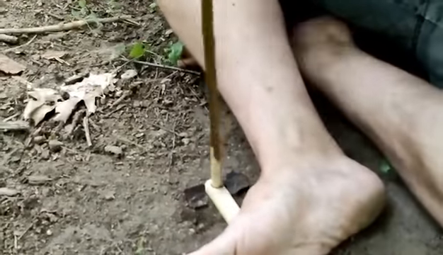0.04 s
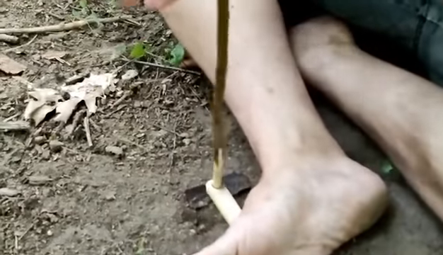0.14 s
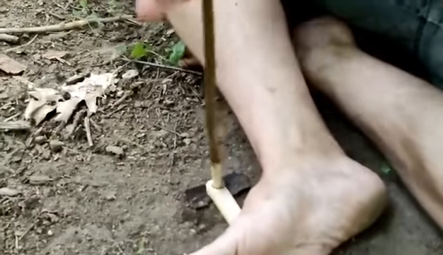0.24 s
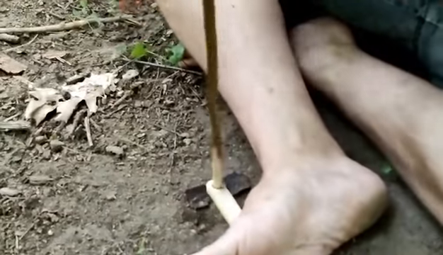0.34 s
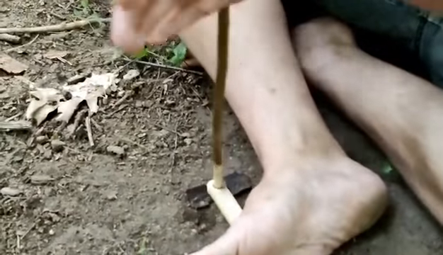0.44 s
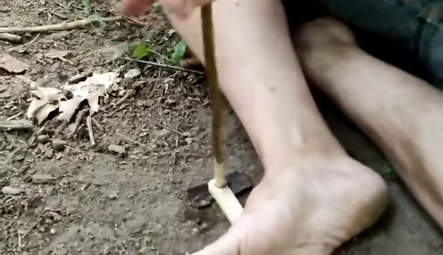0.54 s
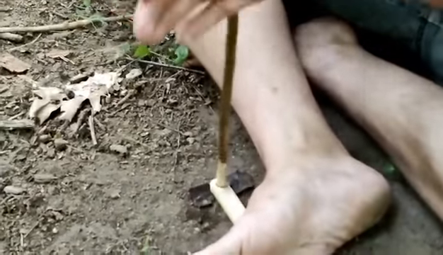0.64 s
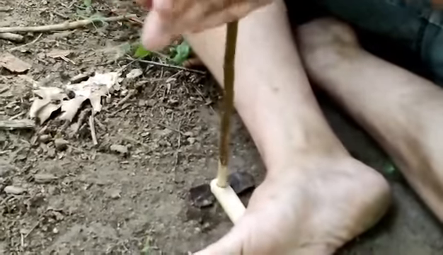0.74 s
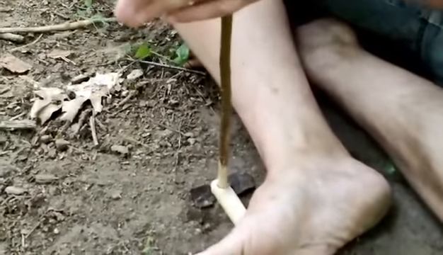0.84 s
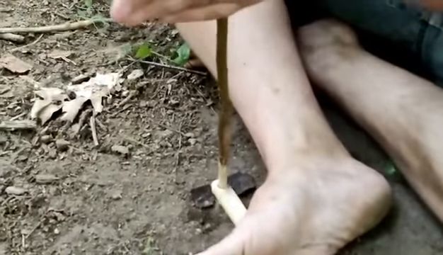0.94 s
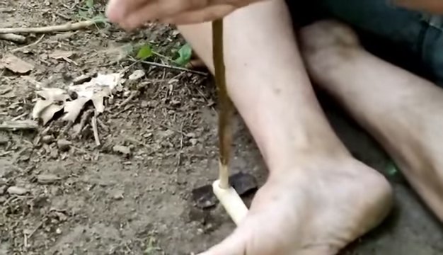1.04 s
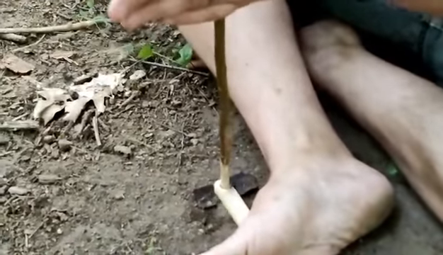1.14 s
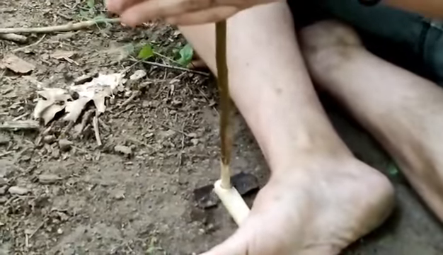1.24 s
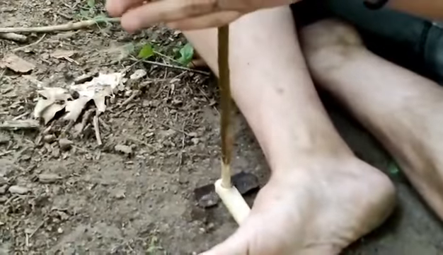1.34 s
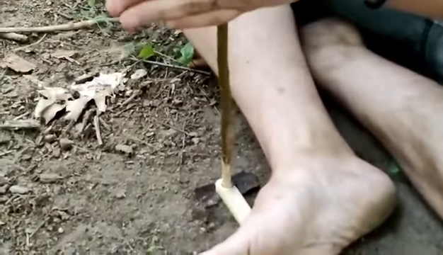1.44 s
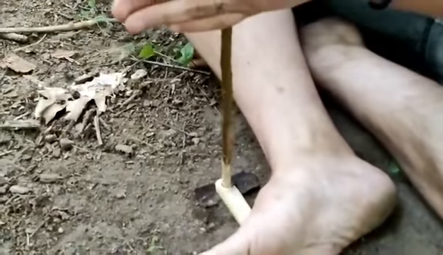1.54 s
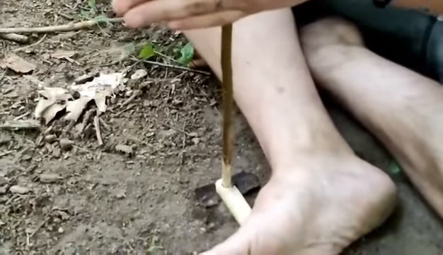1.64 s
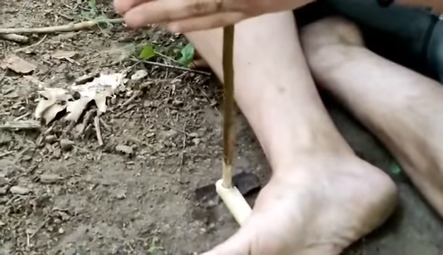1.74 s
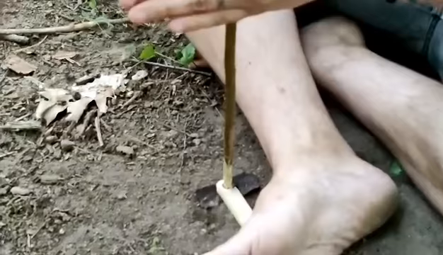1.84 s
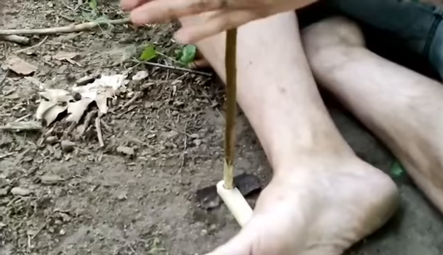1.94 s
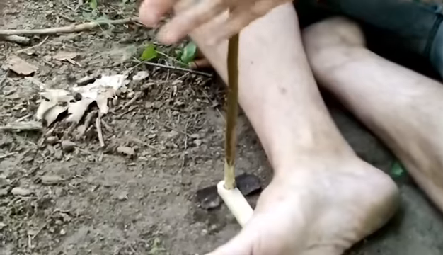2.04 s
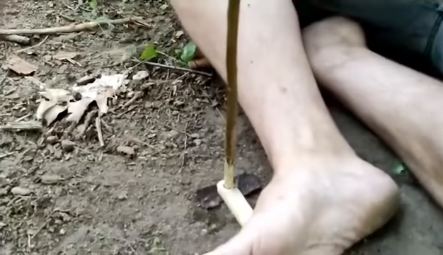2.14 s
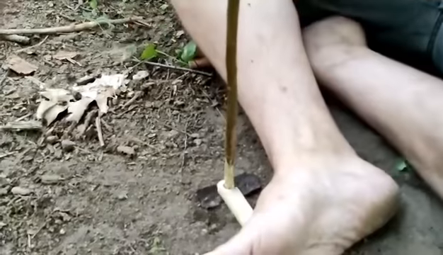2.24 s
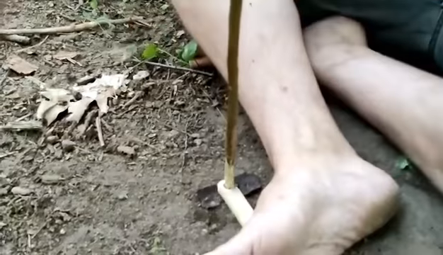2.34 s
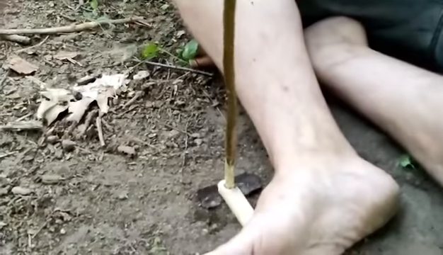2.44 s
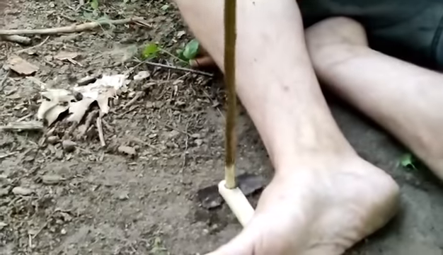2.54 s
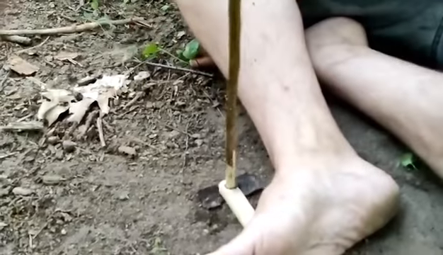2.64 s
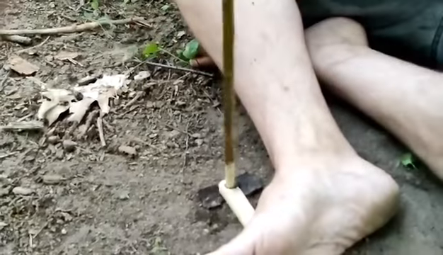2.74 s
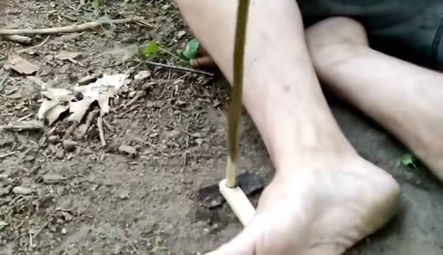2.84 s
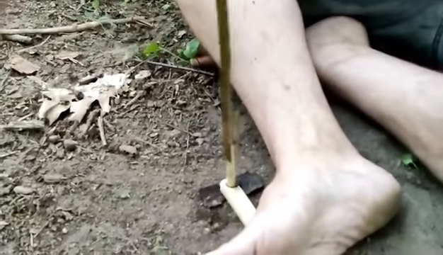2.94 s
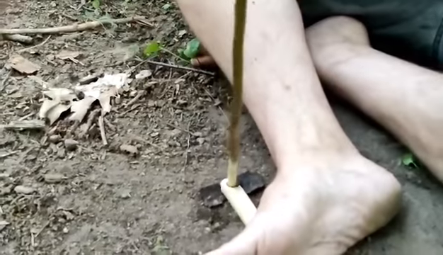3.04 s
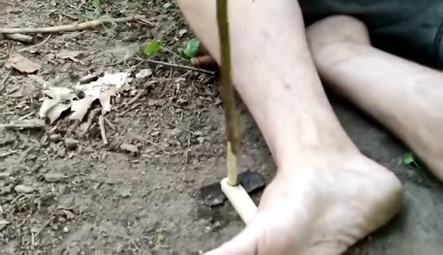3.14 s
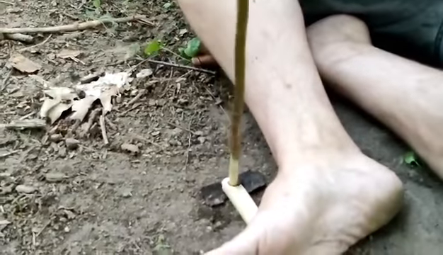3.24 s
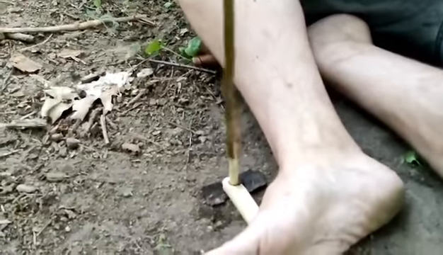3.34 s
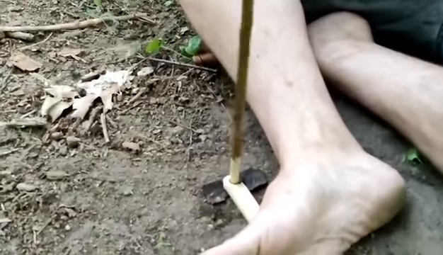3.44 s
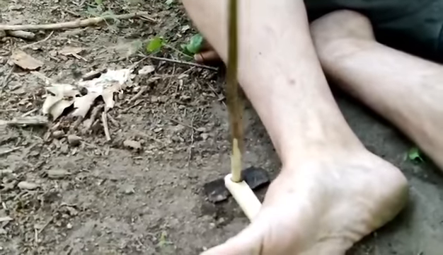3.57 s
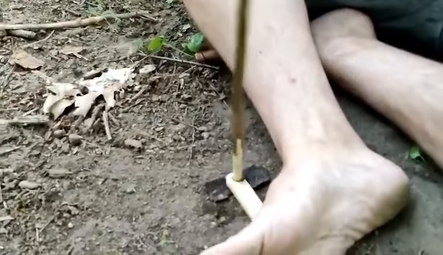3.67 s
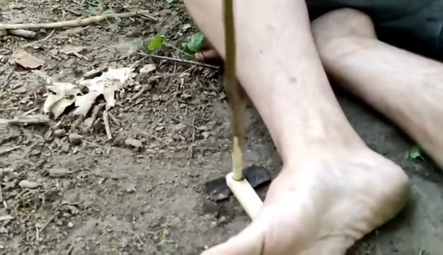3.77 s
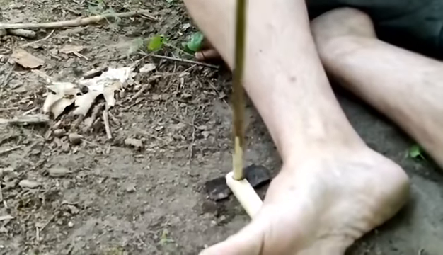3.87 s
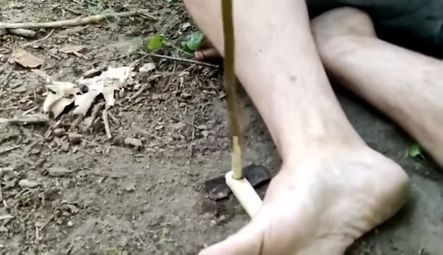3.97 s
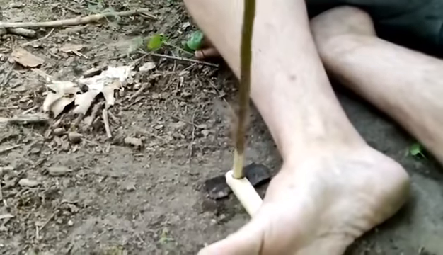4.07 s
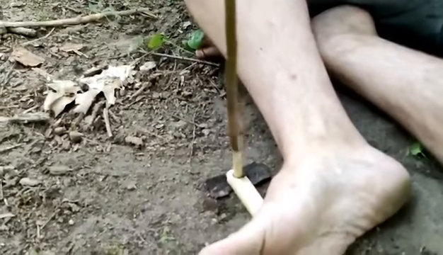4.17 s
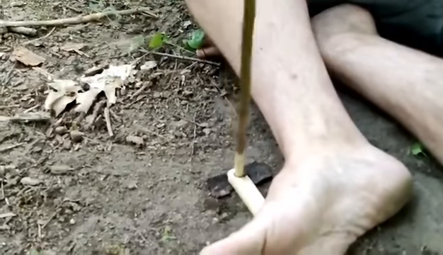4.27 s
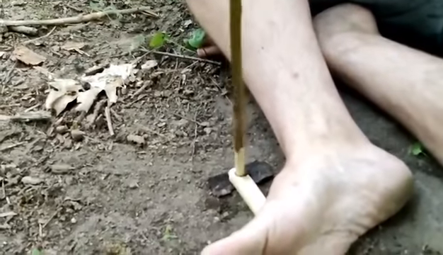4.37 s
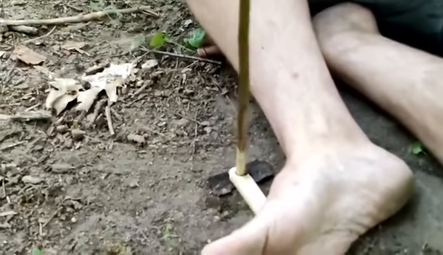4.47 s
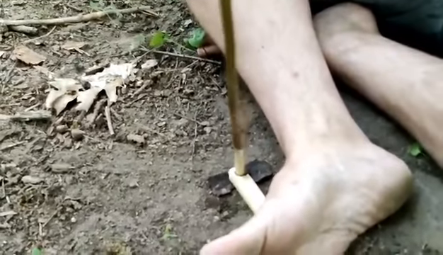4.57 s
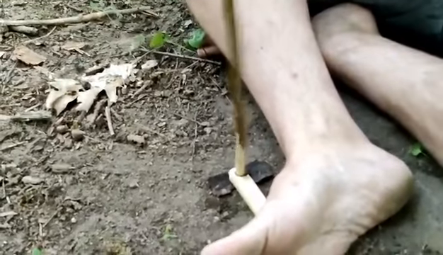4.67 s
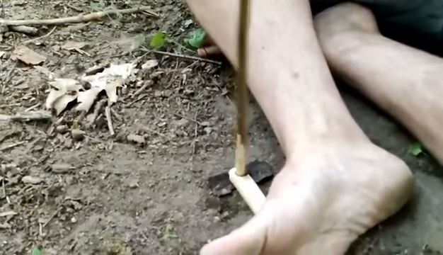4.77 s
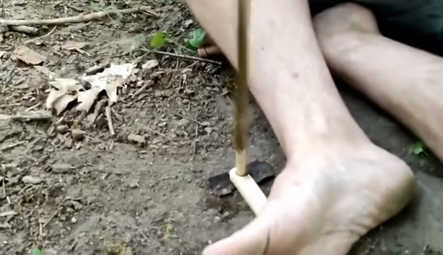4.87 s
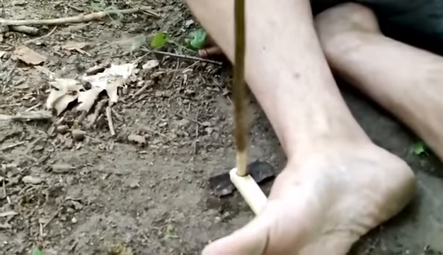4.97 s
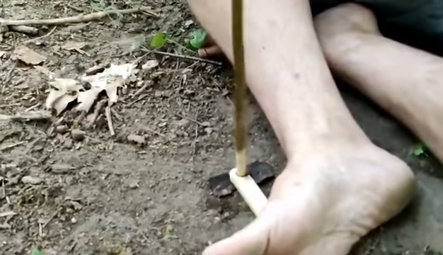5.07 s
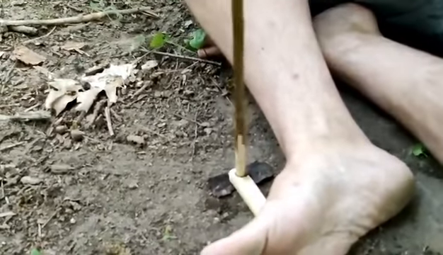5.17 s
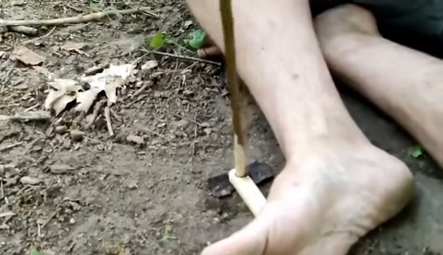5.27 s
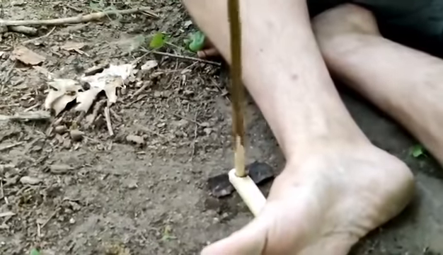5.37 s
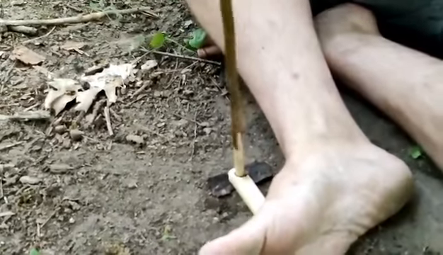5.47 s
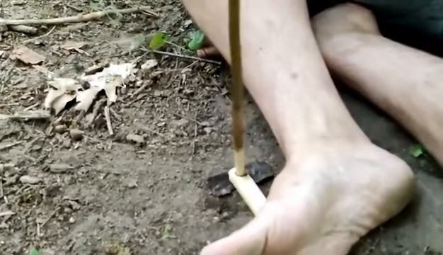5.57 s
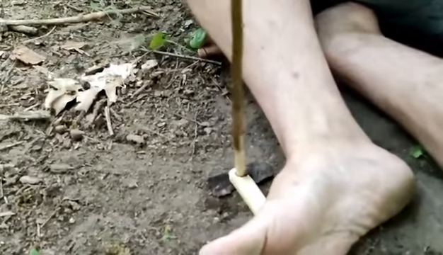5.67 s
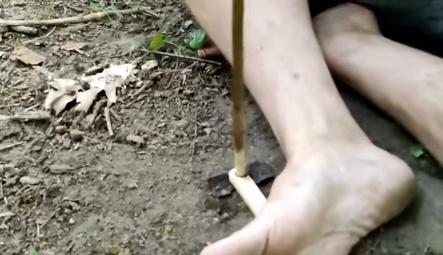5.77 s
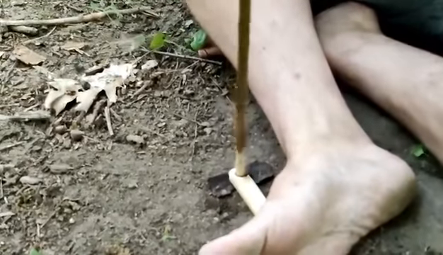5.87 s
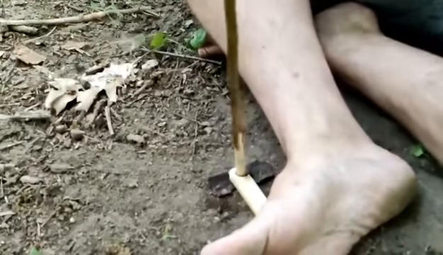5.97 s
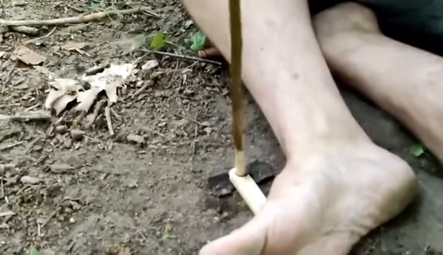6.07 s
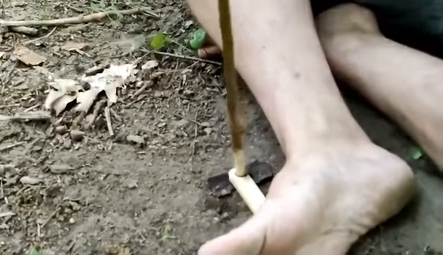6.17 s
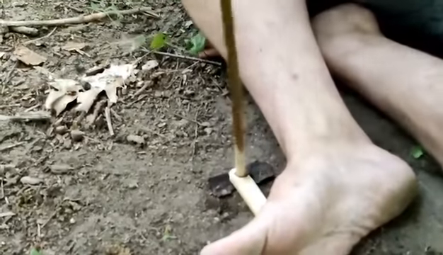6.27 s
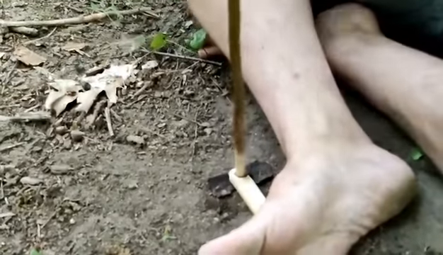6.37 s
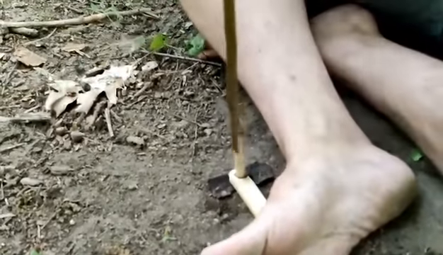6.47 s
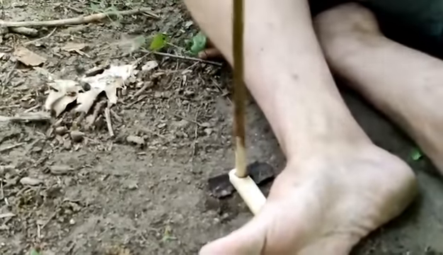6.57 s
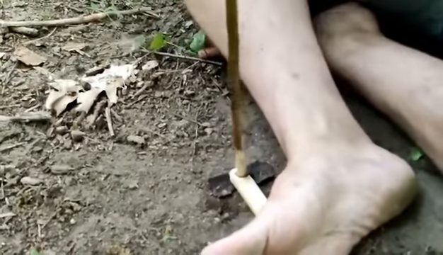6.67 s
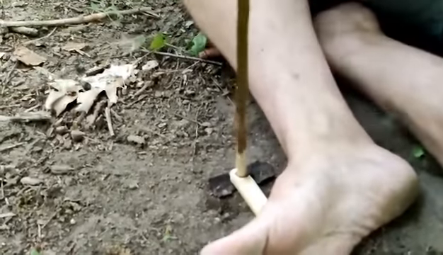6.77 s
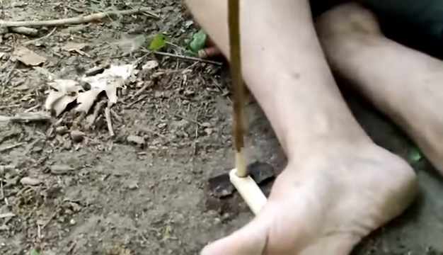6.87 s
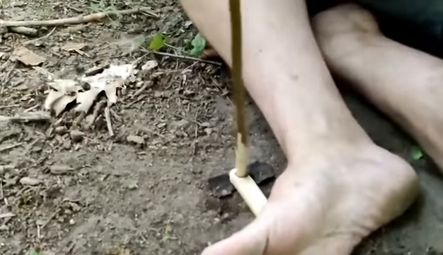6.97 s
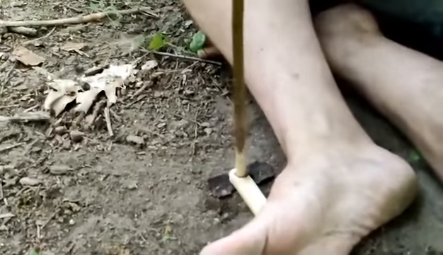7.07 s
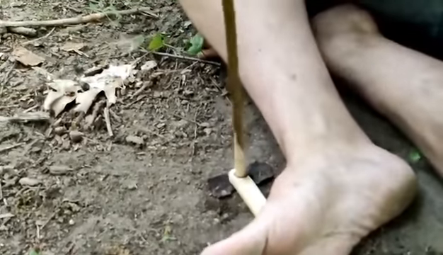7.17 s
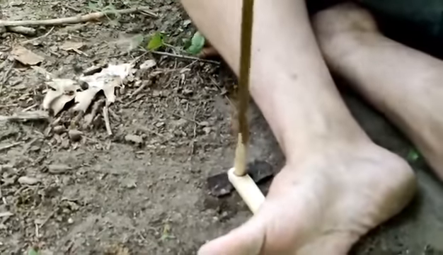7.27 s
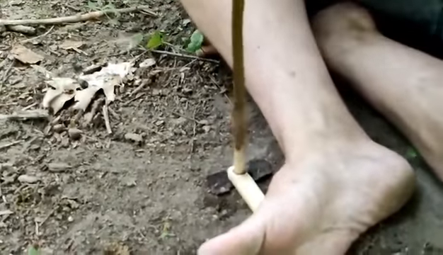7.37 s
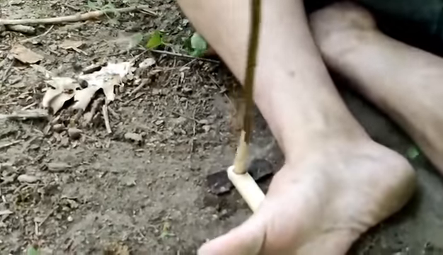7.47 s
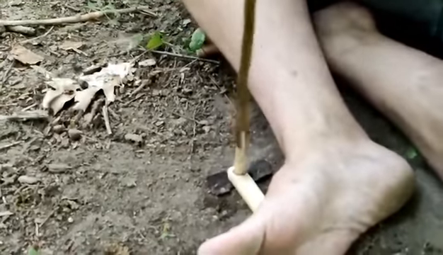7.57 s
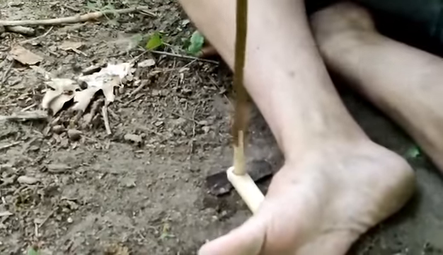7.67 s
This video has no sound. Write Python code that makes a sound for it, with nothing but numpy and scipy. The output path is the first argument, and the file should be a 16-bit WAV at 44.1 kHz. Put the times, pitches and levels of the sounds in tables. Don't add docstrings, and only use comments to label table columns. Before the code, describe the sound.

Dry, fibrous wood rubbing in short back-and-forth strokes, each swish dropping almost to nothing at the reversal. It stops for under two seconds, leaving soft skin-on-bark brushing and sparse dry snaps, then starts again strongly, about nine or ten strokes a second, easing slightly later. Small hollow knocks interrupt it. Close microphone, brighter on the right, with quiet forest rustle and distant traffic behind.

```python
import sys
import numpy as np
from scipy import signal
from scipy.fft import rfft, irfft, next_fast_len
from scipy.io import wavfile
from scipy.ndimage import uniform_filter1d

SR = 44100
rng = np.random.default_rng(int(sys.argv[2]) if len(sys.argv) > 2 else 0)


def rack_gain(trim_db):
    fader = np.asarray(trim_db, float)
    return 10 ** (fader / 20)


def to_wav(sig):
    pcm = np.clip(np.atleast_2d(sig), -1, 1) * 32767
    pcm = np.round(pcm).astype(np.int16)
    wavfile.write(sys.argv[1], SR, pcm.T)


N = 340011
T = np.arange(N) / SR
SIZE = next_fast_len(N + 4096)
HZ = np.maximum(np.arange(SIZE // 2 + 1) * SR / SIZE, 1)
STEP = 40
SLOW_T = np.arange(N // STEP + 2) * STEP / SR


def rms_one(x):
    return x / np.sqrt(np.mean(x ** 2) + 1e-20)


def in_time(rows, t=T):
    s, *columns = np.transpose(rows)
    return [np.interp(t, s, c) for c in columns]


def at_hz(points, hz=HZ):
    point_hz, db = np.transpose(points)
    return np.interp(np.log(hz), np.log(point_hz), db)


def shaped(x, gain):
    return irfft(rfft(x, SIZE) * gain, SIZE)[..., :N]


def drift(rate_hz):
    r = np.exp(-2 * np.pi * STEP * rate_hz / SR)
    noise = rng.standard_normal(len(SLOW_T) + 2000)
    return rms_one(signal.lfilter([1], [1, -2 * r, r * r], noise)[2000:])


def fine(slow):
    return np.interp(T, SLOW_T, slow)


def swell(s, db, rise_s, fade_s, fade_db):
    return db - fade_db * np.where(T < s, (s - T) / rise_s, (T - s) / fade_s)


def ring(clicks, hz, t60):
    r, w = rack_gain(-60 / (t60 * SR)), 2 * np.pi * hz / SR
    return signal.lfilter([0, np.sin(w)], [1, -2 * r * np.cos(w), r * r], clicks)


def add(out, s, sound, pan_db):
    i = round(s * SR)
    panned = sound * rack_gain(np.array([[pan_db / 2], [-pan_db / 2]]))
    out[:, i:i + len(sound)] += panned[:, :N - i]


def grit(per_s, spread_db):
    sizes = rack_gain(spread_db * np.minimum(rng.exponential(1, N), 4)) * rng.choice([-1, 1], N)
    return rms_one(sizes * (rng.random(N) < per_s / SR))


# f/Hz, left-right likeness
LIKENESS = [(60, 0.73), (110, 1), (200, 0.9), (360, 0.78), (660, 0.53), (1210, -0.05), (2200, -0.33),
            (4020, 0.062), (7320, 0.46), (13400, -0.4)]
# f/Hz, left minus right/dB
LEANING = [(60, 2.5), (130, 3), (280, 2.5), (610, 1.5), (1320, 3.5), (2850, 4), (6170, -3.5), (13400, 4.5)]


def far_noise(spectrum):
    mid, side = rfft(rng.standard_normal((2, SIZE)))
    alike = np.clip(at_hz(LIKENESS), -.8, .98)
    side = np.sqrt((1 - alike) / (1 + alike)) * side
    pair = (mid + side * [[1], [-1]]) * rack_gain(at_hz(LEANING) * [[.5], [-.5]])
    low_cut = np.minimum(HZ / spectrum[0][0], 1) ** 2
    out = irfft(pair * rack_gain(at_hz(spectrum)) * low_cut, SIZE)[:, :N]
    return out / np.sqrt(np.mean(out.mean(0) ** 2))


# f/Hz, level/dB per Hz
FOREST = [(150, -77), (250, -47), (392, -8), (487, -8), (637, -10.5), (1140, -16.5), (1420, -13.5),
          (1790, -20.5), (2230, -17.5), (2340, -15), (4410, -25.5), (11200, -29.5), (13500, -29)]


def forest_air():
    return far_noise(FOREST) * rack_gain(-63.5 + fine(drift(41)))


# t/s, firing f/Hz, firing note level/dB
ENGINE = [(1.9, 38, -70), (2.2, 41, -60), (3.0, 50, -58), (3.9, 59.5, -56), (4.15, 61, -46),
          (4.5, 62.2, -45), (4.9, 63, -50), (6.22, 68.8, -44.5), (6.75, 71.5, -45), (7.71, 73.8, -44)]
ORDERS = [(1.5, 1), (2, -4), (2.5, -5), (3, -11)]


def engine():
    pulls_away_s = 1.85
    hz, db = in_time(ENGINE)
    others_db = -53.5 - 60 * np.maximum(pulls_away_s + .3 - T, 0)
    phase = 2 * np.pi * np.cumsum(hz + 0.46 * fine(drift(2.9))) / SR
    note = rack_gain(db - 1 + fine(drift(2))) * np.sin(phase)
    for multiple, order_db in ORDERS:
        note += rack_gain(others_db + order_db - 2 + 3 * fine(drift(3))) * np.sin(multiple * phase)
    return np.sqrt(2) * note * rack_gain([[1.8], [-1.8]])


def heel_thud(out):
    after = np.arange(6000) / SR
    pulse = np.sin(np.pi * after / after[-1]) ** 2 * np.sin(2 * np.pi * 57.2 * after)
    add(out, 3.56, rack_gain(-31.5) * pulse, 2)
    return out


# t/s, level/dB
TRAFFIC = [(0.0, -48.5), (1.05, -52), (1.4, -51.5), (2.1, -52.5), (3.5, -47.5), (4.0, -49.5), (4.9, -49),
           (6.2, -46.5), (7.71, -46)]
# f/Hz, level/dB per Hz
RUMBLE = [(12, -31), (20, 20.5), (76, 1), (126, -3), (296, -21.5), (400, -26.5), (520, -52), (880, -120)]
# t/s, level over the traffic/dB, length/s
LORRIES = [
    (0.304, 7.5, 0.34),
    (1.84, 10.5, 0.11),
    (3.586, 7.5, 0.16),
    (4.9, 8.5, 0.45),
    (6.405, 8, 0.64),
]


def traffic():
    near_db, = in_time(TRAFFIC)
    wheels_db = sum(db * np.exp(-((T - s) / length) ** 2) for s, db, length in LORRIES)
    deep_db = -52.5 + 0.54 * (near_db - near_db.mean()) + wheels_db
    roar_db = near_db + 2 + fine(drift(3))
    rumble, deep = far_noise(RUMBLE), 1 / (1 + (HZ / 45) ** 6)
    thud = rms_one(shaped(rumble, deep)) * rack_gain(deep_db + 1)
    return thud + rms_one(shaped(rumble, 1 - deep)) * rack_gain(roar_db)


# t/s, peak level/dB, left minus right/dB, brightness f/Hz
TICKS = [(1.3315, -36, -14, 4440), (1.334, -37.5, 10, 4470), (2.1122, -42, 20, 4960),
         (2.118, -35, 18, 4320), (2.124, -43, 12, 4200), (2.1312, -34, 17, 5600), (2.355, -40, 22.5, 4420),
         (2.377, -47, -8, 7370), (2.472, -33, 14.5, 5660), (2.4885, -42.5, 21, 5460),
         (2.511, -30.5, -2, 8500), (2.731, -32.5, 16, 3200)]


def ticks(out):
    click = np.r_[1, np.zeros(1200)]
    for s, db, pan_db, hz in TICKS:
        tail = rng.standard_normal(len(click)) * rack_gain(-60 * np.arange(len(click)) / SR / 0.017)
        dull = signal.butter(8, np.clip(hz, 500, 15000), fs=SR, output="sos")
        spike = signal.sosfilt(dull, click + 0.068 * tail)
        wood = .1 * ring(click + .5 * tail, 680, .009) + .05 * ring(click, 330, .012)
        snap = spike / spike.max() + wood
        add(out, s, -snap * rack_gain(db), pan_db)
    return out


# peak t/s, level/dB, fade/s
BRUSHES = [
    (0.83, -62, 0.056),
    (0.924, -58, 0.15),
    (1.174, -58, 0.16),
    (1.494, -60.5, .3),
    (1.82, -80, .04),
    (2.046, -72, .02),
    (2.134, -64, .03),
    (2.382, -75, .04),
]


def sliding():
    colour_db = at_hz([(600, -20), (2500, -3), (6500, 0), (8200, -10), (13000, -22)])
    skin = shaped(grit(6000, spread_db=2.5), rack_gain(colour_db))
    swells_db = [swell(s, db, 0.059, fade_s, 15.5) for s, db, fade_s in BRUSHES]
    return rms_one(skin) * rack_gain(np.max(swells_db, axis=0) - 6) * rack_gain([[-8], [3]])


# t/s, peak level/dB, f/Hz, left minus right/dB
CATCHES = [(0.099, -47, 1780, 4), (0.168, -42, 428, 6), (0.545, -41, 1720, -6), (2.763, -34.5, 1704, 3),
           (3.582, -33.5, 830, 2.0), (4.428, -29, 1700, -7), (4.644, -32, 894, 0), (4.756, -35, 1620, -3),
           (4.868, -33, 1730, -3), (4.977, -43, 766, 3), (5.312, -55, 710, -3), (5.429, -37, 705, 1),
           (5.757, -40, 1907, -0.5), (5.891, -36, 926, 5), (6.025, -39.5, 446, 23), (6.15, -38.5, 460, 9),
           (6.615, -35, 723, 2), (6.858, -36.5, 377, 3), (7.662, -37.5, 886, -1.0)]


def catches(out):
    click = np.r_[np.hanning(9), np.zeros(1500)]
    for s, db, hz, pan_db in CATCHES:
        knock = ring(click, hz, 0.022) + .5 * ring(click, 1.4 * hz, 0.0085)
        add(out, s, -knock / np.abs(knock).max() * rack_gain(db), pan_db)
    return out


# reversal t/s, tip scrape level/dB, palm hiss over the scrape/dB
OPENING = [
    (-0.06, -38.5, -2.5),
    (0.065, -41, 3.5),
    (0.206, -43, 2),
    (0.308, -43, 5),
    (0.432, -42.5, 1.5),
    (0.561, -44.5, 1),
    (0.674, -57, -1),
]
PUSHES = [(2.536, -39, 8), (2.755, -34.5, 4.5), (2.95, -36.5, 7.5), (3.142, -40.5, 10), (3.34, -42.5, 12.5),
          (3.551, -41, 9), (3.755, -42.5, 6.5), (3.96, -41.5, 8.5), (4.169, -43.5, 7.5), (4.384, -43, 8),
          (4.607, -42.5, 6), (4.824, -40.5, 5.5), (5.048, -43.5, 6.5), (5.27, -43, 5), (5.495, -43, 4.5),
          (5.731, -42.5, 7.5), (5.958, -42.5, 5), (6.19, -43.5, 5), (6.417, -41.5, 4), (6.65, -45, 4),
          (6.886, -46, 2), (7.131, -47.5, 5), (7.373, -49.5, 9.5), (7.62, -45, 1.5)]
PULLS = [(2.655, -44, 7.5), (2.851, -38.5, 8.5), (3.04, -43.5, 9.5), (3.234, -45, 11), (3.442, -44.5, 9.5),
         (3.653, -41.5, 4.5), (3.854, -42, 2.5), (4.061, -45.5, 4.5), (4.272, -43.5, 5), (4.493, -44, 4),
         (4.713, -42.5, 3.5), (4.932, -40, 3), (5.161, -40.5, -1), (5.388, -38.5, 3.5), (5.62, -42.5, 7.5),
         (5.848, -42, 7), (6.083, -40, 5.5), (6.306, -45, 6.5), (6.533, -43, 4), (6.773, -43.5, 4),
         (7.012, -47.5, 2.5), (7.245, -49.5, 5), (7.496, -46, 4)]
FUMBLES = [
    (0.184, -50, 3),
    (2.505, -48.5, -5),
]
RESTS_S = (0.754, 7.74)
HABITS = [
    (0.64, 0.56, -2.1, -6),
    (0.55, 0.64, -1.63, 2.5),
    (0.64, 0.72, -0.6, -1),
    (.87, 0.6, -5, -8),
]
# t/s, level/dB
PRESSURE = [(0, 1), (0.7, -4.5), (2.55, -4.5), (3.15, -3), (3.5, 0.7), (4.2, 0.2), (4.75, 1.5), (5.85, 0.6),
            (6.3, -1), (7.2, -2.5), (7.71, 1.3)]


def half_turns():
    kinds = zip((OPENING, PUSHES, PULLS, FUMBLES), HABITS)
    strokes = sorted(row + habit for rows, habit in kinds for row in rows)
    start, tip_db, over_db, top, soft, board_db, dust_db = np.transpose(strokes)
    turns = np.sort(np.r_[start, RESTS_S])
    end = turns[np.searchsorted(turns, start, "right")]
    since = np.maximum(start - PUSHES[0][0], 0)
    second = start > RESTS_S[0]
    tip = tip_db + 43
    palm = tip_db + over_db + 41
    board = board_db + in_time(PRESSURE, start)[0] + 0.13 * tip
    dust = dust_db + 0.56 * tip + 0.067 * (palm - palm.mean())
    dust = dust - 7 * np.exp(-since / 0.091) * second
    shaft = board + 0.66 * (tip - board)
    shaft = shaft - 4 * np.exp(-since / .8) * second
    top = top + 0.014 * since
    return zip(start, end, top, soft, np.transpose([board, shaft, tip, palm, dust]))


def spin(round_top):
    speed, levels = np.zeros(len(SLOW_T)), np.zeros((5, len(SLOW_T)))
    creep = 0.071 * rack_gain(7.2 * drift(7.4))
    for start, end, top, soft, db in half_turns():
        now = (SLOW_T >= start) & (SLOW_T < end)
        part = (SLOW_T[now] - start) / (end - start)
        top = np.clip(top, .1, .9)
        rise, fall = (part / top) ** (soft * top), ((1 - part) / (1 - top)) ** (1 - top)
        speed[now] = np.maximum((rise * fall) ** round_top, creep[now])
        levels[:, now] = db[:, None]
    return np.abs(uniform_filter1d(speed, size=3)), uniform_filter1d(levels, size=5)


def passing_hands(x, echo_db):
    out = x.copy()
    for side, path_ms in ((0, 0.45), (0, 0.92), (1, 0.455), (1, 1.2)):
        delay_s = path_ms / 1000 * rack_gain(1.613 * fine(drift(2.35)))
        out[side] += rack_gain(echo_db) * np.interp(T - delay_s, T, x[side])
    return out


LAYER_HZ = (1000, 2100, 3300, 7200, 11500)
# f/Hz, level/dB per Hz
RIGHT_PORT = [(250, -85.5), (700, -85.5), (1150, -84), (1900, -83.5), (2900, -76), (3900, -72), (4300, -79),
              (4700, -83), (5150, -80), (6100, -76.5), (7600, -78), (8200, -82.5), (10500, -85.5),
              (13200, -93)]
LEFT_PORT = [(250, -90), (700, -84.5), (1150, -88.5), (2100, -83), (3100, -76.5), (3700, -80),
             (4800, -89.5), (5900, -100.5), (6700, -116), (7200, -99), (9300, -96.5), (10100, -104),
             (11400, -90.5), (13200, -96.5)]
# f/Hz, width/Hz, level/dB
WOOD = [(703, 77, 6), (873, 90, 5.5), (1534, 450, 3.5), (2137, 50, 7), (3120, 220, -3.5), (3460, 34, 2),
        (4650, 97, 8)]
# t/s, left minus right/dB
HANDS = [(0.0, -0.5), (0.39, -2), (0.8, -1), (2.45, 4), (3.07, 4), (3.39, -3), (5.56, -3), (6.4, -1.1),
         (7.41, -7.5), (7.71, -6.5)]


def drill(patchy_db, judder_db, shared):
    speed, levels = spin(round_top=2.51)
    pan_db, = in_time(HANDS, SLOW_T)
    lag_ms, grip_lag_ms, since = 0.092, 0.015, SLOW_T - 2.7
    lag_ms = lag_ms - (lag_ms - grip_lag_ms) * (since > 0) * np.exp(-np.abs(since) / 0.27)
    near = grit(20000, spread_db=2.0)
    late = np.interp(T - fine(lag_ms) / 1000, T, near)
    left_grit = np.sqrt(shared) * late + np.sqrt(1 - shared) * grit(20000, spread_db=3.0)
    both = rfft([left_grit, near], SIZE)
    centres, out, judder = np.geomspace(300, 13000, 15), 0, drift(35)
    for k, hz in enumerate(centres):
        band_gain = np.interp(np.log(HZ), np.log(centres), np.arange(15) == k)
        band = irfft(both * band_gain, SIZE)[:, :N]
        weights = [np.interp(np.log(hz), np.log(LAYER_HZ), row) for row in np.eye(5)]
        steep = at_hz([(400, 1.29), (3000, 1.28), (9000, 1.49)], hz)
        patches = drift(6) + 1.85 * drift(31)
        db = weights @ levels + 3.0 + judder_db * judder + patchy_db * patches
        lean_db = pan_db * at_hz([(1500, 0.049), (2500, 0.84), (4500, 1.77), (13000, 1.07)], hz)
        own_db = 1.1 * drift(24)
        left, right = speed ** steep * rack_gain(db + (lean_db + own_db) * np.array([[.6], [-.4]]))
        out = out + band * [fine(left), fine(right)]
    out = passing_hands(out, echo_db=-12) * rack_gain(-1.49)
    wood = 1 + sum((rack_gain(db) - 1) / (1 + 2j * (HZ - hz) / width) for hz, width, db in WOOD)
    ports = rack_gain([at_hz(LEFT_PORT) + 1, at_hz(RIGHT_PORT) - 2]) * np.sqrt(SR / 2)
    return shaped(out, ports * wood * np.minimum(HZ / 250, 1) ** 2)


def scene():
    far = forest_air() + traffic() + heel_thud(engine())
    hands = sliding() + drill(patchy_db=1.5, judder_db=0.05, shared=0.4)
    return far + catches(ticks(np.zeros((2, N)))) + hands


def top_cut(x):
    return signal.sosfilt(signal.butter(12, 13950, fs=SR, output="sos"), x)


def record(dry):
    return top_cut(dry)


dry = scene()
out = record(dry)
to_wav(out)
```